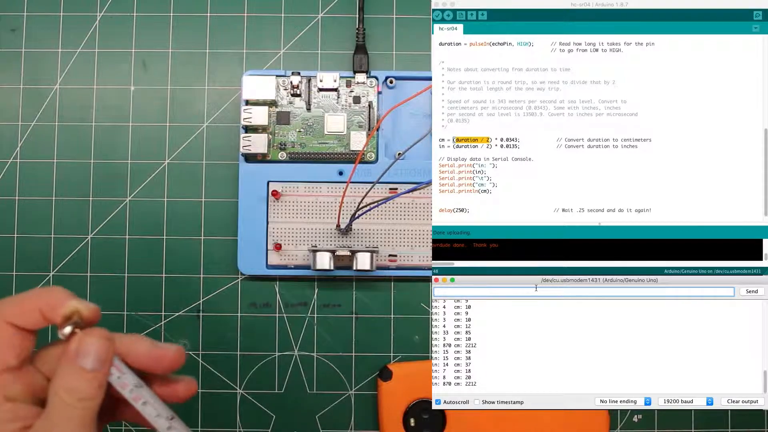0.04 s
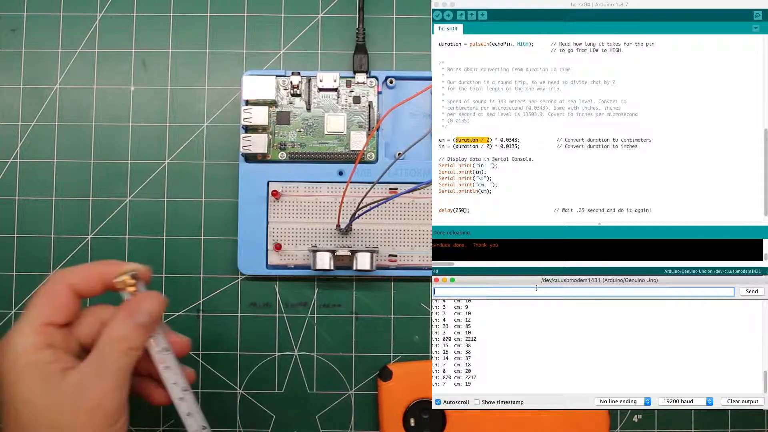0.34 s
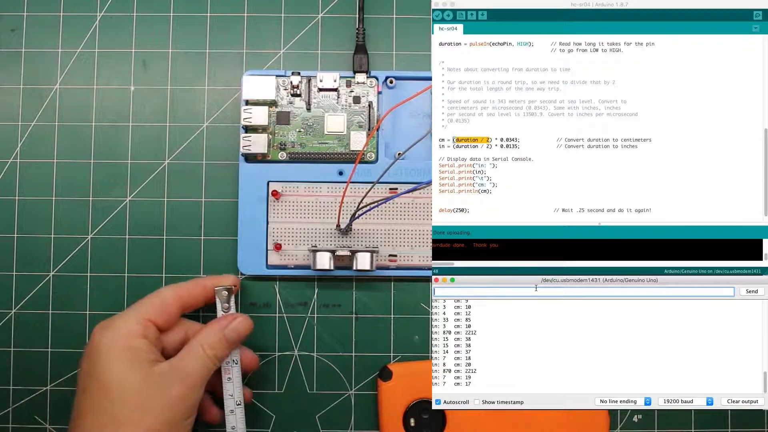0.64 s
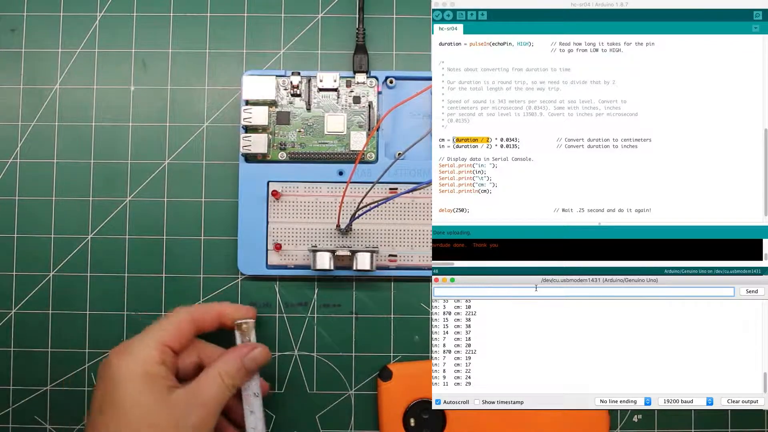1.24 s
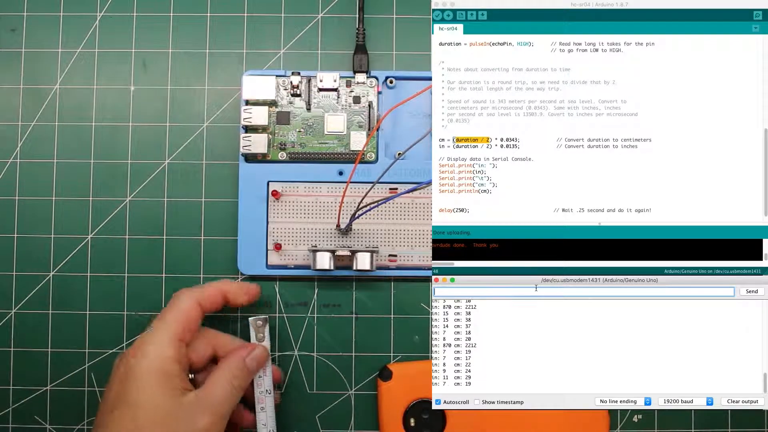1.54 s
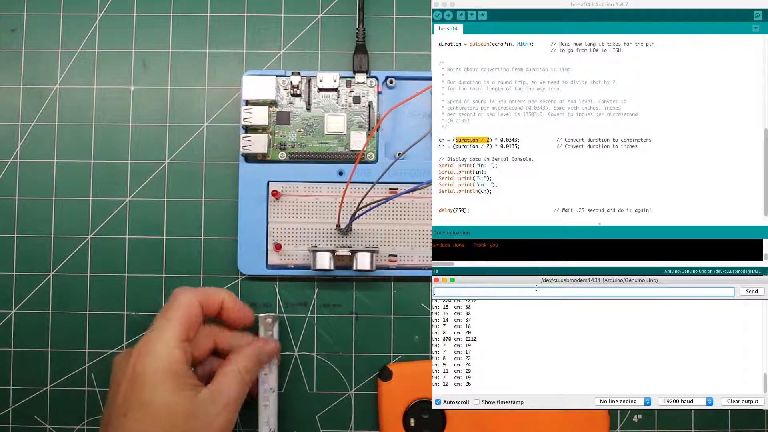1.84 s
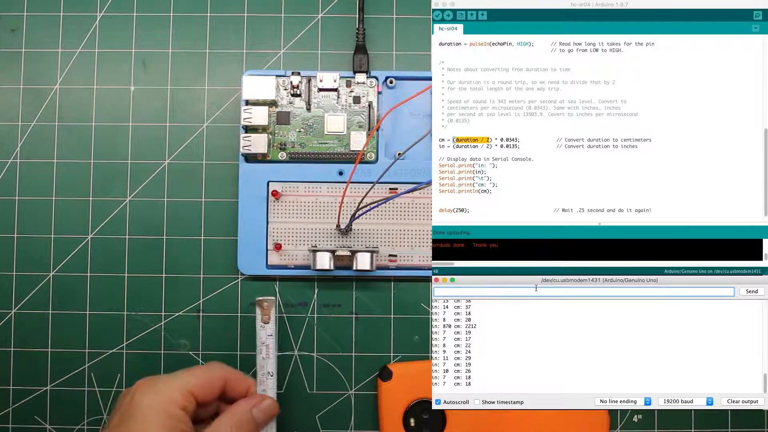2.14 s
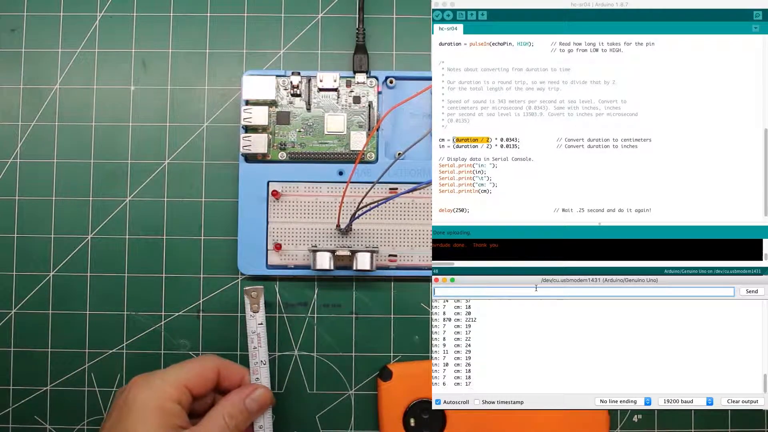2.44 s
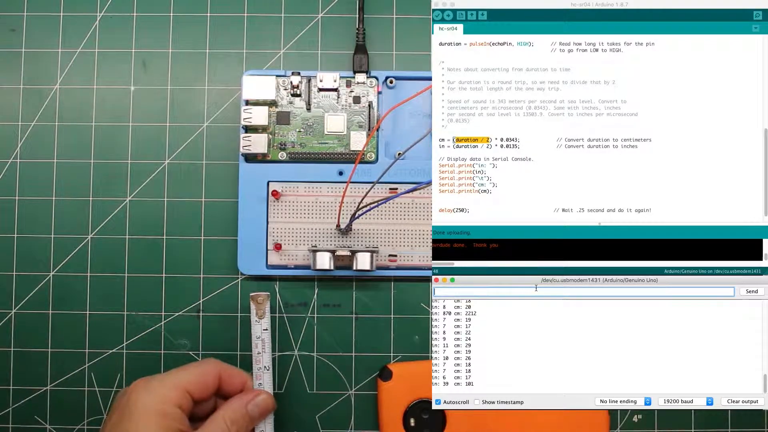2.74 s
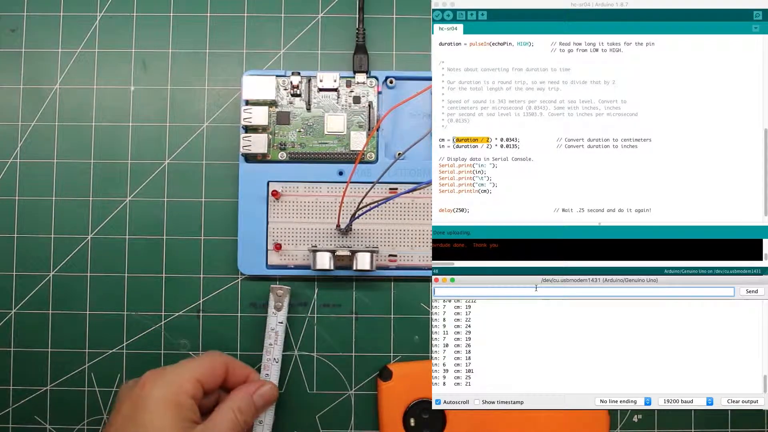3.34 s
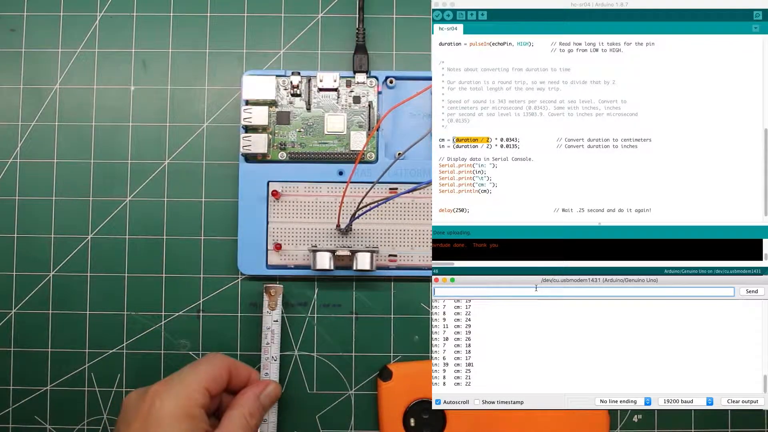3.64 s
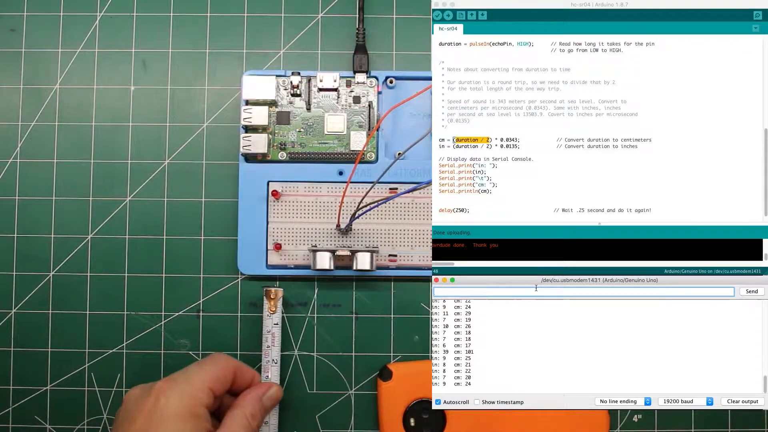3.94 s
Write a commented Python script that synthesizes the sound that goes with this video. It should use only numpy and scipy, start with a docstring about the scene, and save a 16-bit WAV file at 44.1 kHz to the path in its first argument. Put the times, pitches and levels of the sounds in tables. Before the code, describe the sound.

Light metallic clicks and scrapes of a tape measure blade, which then slaps a desk twice.

```python
"""A steel tape measure is handled over a desk mat, close to the microphone.
Its loose end hook clicks, and the thin blade scrapes and rings as it is rubbed or snapped.
Bumps set the desk ringing, and near the end the blade slaps down on it twice and chatters.
In the first second, fingers slide along the blade with a fading hiss. Behind it all are a faint hiss,
low room noise and mains hum. Both hisses and the room noise dip briefly four times a second."""
import sys
import numpy as np
from scipy import signal
from scipy.fft import rfft, irfft
from scipy.io import wavfile
from scipy.ndimage import uniform_filter1d

SR = 44100
rng = np.random.default_rng(int(sys.argv[2]) if len(sys.argv) > 2 else 0)


def generate_wav(sig):
    """Save sig (samples, or channels by samples) to the path in sys.argv[1] as 16-bit PCM at SR."""
    pcm = np.round(np.clip(np.atleast_2d(sig).T, -1, 1) * 32767).astype(np.int16)
    wavfile.write(sys.argv[1], SR, pcm)


N = 176400
T = np.arange(N) / SR

# how loud the hiss, the room and the sliding fingers are over time: t/s, level/dB
HISS_LEVEL = [(0, -67.5), (.9, -70), (1.05, -69), (1.2, -64.5), (1.45, -68.5), (1.7, -66), (1.87, -71.5),
              (2.0, -66), (2.2, -70.5), (2.48, -68), (2.95, -67.5), (3.2, -67), (3.65, -66.5), (4, -65.5)]
ROOM_LEVEL = [(0, -58), (.4, -59.5), (.8, -64.5), (1.3, -62.5), (1.55, -70), (1.75, -67), (2.3, -65.5),
              (3.1, -67), (3.65, -61), (4, -61)]
FINGER_LEVEL = [(0, -51.5), (.07, -52.5), (.19, -53), (.3, -57), (.42, -58), (.55, -58.5), (.65, -62),
                (.75, -68.5), (.92, -63.5), (1.0, -79)]
# how strong each noise is from low to high pitch: f/Hz, relative level/dB
HISS_SPECTRUM = [(880, -38), (1500, -15), (2500, -8.5), (2860, -14), (4410, -11), (4720, -12.5), (5050, -8),
                 (10600, -9.5), (13400, -24), (15000, -48)]
ROOM_SPECTRUM = [(18, -77), (30, -24), (118, -3.5), (174, -9.5), (201, -6.5), (303, -9.5), (380, -14.5),
                 (486, -17.5), (634, -27), (674, -27), (1220, -24.5), (1380, -26), (1910, -26.5),
                 (3470, -34.5), (4000, -35.5), (5200, -43), (8800, -120)]
FINGER_SPECTRUM = [(600, -28), (1200, -4.5), (1600, -15), (2400, -7), (3200, -11.5), (4300, -6),
                   (6000, -7.5), (7500, -2), (9500, -3), (11000, -0.5), (11800, -8), (12500, -17),
                   (14000, -19)]
SCRAPE_SPECTRUM = [(290, -29), (500, -10.5), (788, -18.5), (1990, -18), (3720, -5), (6030, -4.5),
                   (9250, -0.5), (12100, -11), (14000, -12), (15000, -46)]
CHATTER_SPECTRUM = [(100, -26), (200, -6), (360, -3), (550, -8.5), (720, -1), (880, -12.5), (1120, 2),
                    (1500, -10), (2200, -8.5), (3500, -17.5), (5000, -6.5), (6500, -13.5), (8200, -7),
                    (10000, -16.5), (12000, -25), (15000, -26)]
TAIL_SPECTRUM = [(100, -19), (220, -5.5), (380, 0.5), (600, -17.5), (1150, -11), (1500, -21.5), (2600, -17),
                 (4000, -23), (8000, -22.5), (11000, -29), (15000, -48)]
# the natural tones of desk and blade: f/Hz, relative level/dB, t60/s (time to fade by 60 dB)
DESK_TONES = [(78.5, -15, 0.2), (98.6, -9, 0.25), (121.9, -8.5, 0.21), (232, -7, 0.13), (281, -8.5, 0.21),
              (343.7, -2, 0.15), (361.5, -1, 0.09), (412, -11.5, 0.16), (466.5, -11.5, 0.26),
              (515, -16.5, 0.28), (702, -5.5, 0.14), (872, -18, 0.11), (1051, -9, 0.091),
              (1158, -6.5, 0.086)]
BLADE_TONES = [(2460, -23, 0.22), (3040, -3, 0.15), (3741, -25, 0.19), (4479, -28, 0.26), (5500, -26, 0.21),
               (6492, -11, 0.067), (6900, -20, 0.36), (7079, -23, 0.17), (7445, -21, 0.19),
               (8100, -22, 0.17), (8280, -14, 0.1), (9184, -13, 0.11), (10100, 2, 0.071), (9700, -26, 0.23)]
# blows that reach the desk: t/s, strength/dB, softness/s
DESK_BLOWS = [(0.115, -53, 0.00043), (1.128, -34.5, 0.0036), (1.662, -47.5, 0.00072), (1.692, -49, 0.0024),
              (2.652, -37, 0.004), (2.901, -53.5, 0.00065), (3.4375, -21.5, 0.000063),
              (3.7321, -31, 0.00096), (3.744, -21.5, 0.0038)]
# the blade slaps down: t/s, strength/dB, chatter length/s
BLADE_SLAPS = [(3.437, -23, .015), (3.733, -48, 0.025)]
# the bent blade rings, its pitch set by its free length: t/s, hold/s, f/Hz, width/Hz, level/dB, fall/s
BLADE_RINGS = [(0.103, 0.024, 2330, 300, -52, 0.03), (0.115, .008, 485, 149, -48, 0.011),
               (0.116, 0.0045, 4200, 500, -47, .016), (0.396, 0.077, 2220, 280, -69, 0.028),
               (1.103, .008, 1250, 1180, -58, 0.0033), (1.125, .16, 3080, 300, -68, 0.016),
               (1.226, .07, 2120, 318, -72, 0.014), (1.656, 0.038, 1360, 420, -65, 0.021),
               (1.662, .004, 3420, 260, -61, 0.022), (1.717, .8, 1380, 263, -79, .05),
               (2.563, 0.0088, 2650, 700, -62.5, .004), (2.9, 0.0042, 556, 280, -53.5, 0.0058),
               (2.901, 0.016, 2920, 1580, -52, .042), (3.855, 0.15, 2360, 480, -71, 0.013)]
# the blade slides against hook and mat: t/s, rough length/s, level/dB
BLADE_SCRAPES = [(1.123, 0.0068, -34), (1.154, 0.048, -55), (1.232, 0.14, -65), (1.374, 0.033, -62),
                 (1.544, 0.029, -55), (1.937, 0.052, -63.5), (2.248, 0.11, -64.5), (2.412, 0.019, -60),
                 (2.527, 0.022, -69), (2.649, 0.036, -47.5), (2.683, .016, -56), (2.769, 0.028, -45),
                 (2.806, 0.049, -54.5), (3.119, 0.011, -58.5), (3.189, 0.015, -56.5), (3.27, 0.02, -40),
                 (3.297, 0.054, -54.5), (3.701, 0.03, -56), (3.74, 0.019, -45.5), (3.769, 0.048, -53)]
# the pitch ranges of hook, body, blade and edge: low f/Hz, high f/Hz, gain/dB, short ring/dB, long ring/dB
CLICK_RANGES = [(4700, 8770, -14, -14, -32), (446, 2220, -0.5, -25, -19.5), (2230, 4800, -3, -8.5, -23),
                (8250, 12460, -7.5, -7.5, -23)]
# clicks, with a level for each range before its gain: t/s, hook/dB, body/dB, blade/dB, edge/dB, fall/s
HOOK_CLICKS = [(0.114, -12.5, -35.5, -23, -32, 0.0021), (0.286, -27, -64, -52, -46.5, 0.002),
               (0.395, -40, -66, -48, -46.5, 0.0033), (0.462, -38, -63, -58, -58, 0.0018),
               (0.894, -35.5, -69, -60.5, -54, 0.002), (0.918, -40, -68, -64, -52, 0.0023),
               (1.062, -45, -85, -59.5, -78, 0.0023), (1.127, -17, -42.5, -36.5, -26.5, 0.0018),
               (1.168, -35, -66, -53.5, -47, 0.0016), (1.223, -36.5, -76, -48, -69, 0.0017),
               (1.236, -49, -68, -52, -65, 0.0025), (1.295, -46, -65, -54.5, -55, 0.0032),
               (1.471, -43, -81, -61.5, -76, 0.002), (1.547, -39.5, -69, -62, -44.5, 0.0013),
               (1.661, -36.5, -49.5, -52, -52.5, 0.0029), (1.691, -43, -63, -57, -58, 0.0017),
               (1.79, -44, -71, -71, -53.5, 0.0026), (2.068, -45.5, -79, -64, -50.5, 0.002),
               (2.396, -39, -56, -67, -71, 0.0022), (2.418, -28.5, -56.5, -48.5, -49, 0.0023),
               (2.536, -38, -55, -59.5, -56, 0.0018), (2.563, -44, -70, -56, -75, 0.002),
               (2.651, -22, -56, -41.5, -24.5, 0.0012), (2.66, -29, -65, -54, -32, 0.0017),
               (2.676, -33, -71, -54, -40, 0.002), (2.699, -31, -62, -48, -41, 0.0023),
               (2.742, -33, -56, -49, -46.5, 0.0029), (2.772, -25, -54, -40.5, -36, 0.0035),
               (2.78, -24, -70, -59, -29.5, 0.0018), (2.797, -36, -83, -54, -54, 0.0017),
               (2.824, -35, -61, -53, -44.5, 0.0035), (2.87, -18.5, -50, -41.5, -35.5, 0.0022),
               (2.899, -11.5, -38, -21.5, -32, 0.0014), (3.071, -40, -76, -66, -62, 0.0024),
               (3.084, -41, -68, -54.5, -53.5, 0.0023), (3.134, -34.5, -80, -57, -69, 0.0016),
               (3.257, -32, -63, -58, -39.5, 0.0044), (3.314, -31, -68, -66, -37, 0.003),
               (3.718, -35, -68, -72, -40.5, 0.0023), (3.731, -18, -62, -57, -30.5, 0.0028),
               (3.766, -35, -64, -72, -49, 0.002)]


def from_db(db):
    """Turn decibels into a factor to multiply by."""
    return 10 ** (np.asarray(db) / 20)


def rms_one(x):
    """Scale a signal so that its average power is one."""
    return x / np.sqrt(np.mean(x ** 2) + 1e-20)


def coloured(x, spectrum):
    """Shape a signal's lows and highs to follow a spectrum, at average power one."""
    hz, db = np.transpose(spectrum)
    f = np.maximum(np.fft.rfftfreq(len(x), 1 / SR), 1)
    gain = from_db(np.interp(np.log(f), np.log(hz), db))
    return rms_one(irfft(rfft(x) * gain, len(x)))


def band(x, low, high, order=2):
    """Keep the frequencies between low and high, in Hz."""
    return signal.sosfilt(signal.butter(order, [low, high], "band", fs=SR, output="sos"), x)


def add(out, start, x):
    """Mix x into out at a start time in seconds."""
    i = int(start * SR)
    out[i:i + len(x)] += x[:max(N - i, 0)]


def dying(t, t60):
    """A fade that loses 60 dB every t60 seconds."""
    return np.exp(-np.log(1000) * t / t60)


def ringing(tones, t):
    """A struck object rings as a sum of fading tones, every second one flipped in sign."""
    return sum((-1) ** k * from_db(db) * np.sin(2 * np.pi * hz * t) * dying(t, t60)
               for k, (hz, db, t60) in enumerate(tones))


def stroke(t, hold, rise, fall):
    """A loudness shape that rises, stays up until the time hold, then dies away."""
    return np.clip(t / rise, 0, 1) * np.exp(-np.maximum(t - hold, 0) / fall)


def slips(per_s, spread_db):
    """Many tiny contacts at random times and of uneven size."""
    contacts = (rng.random(N) < per_s / SR) * rng.choice([-1, 1], N)
    return contacts * from_db(spread_db * np.minimum(rng.exponential(1, N), 4))


def shaped_noise(levels, spectrum):
    """Noise with a set spectrum whose loudness follows a curve over time."""
    gain = from_db(np.interp(T, *np.transpose(levels)))
    return gain * coloured(rng.standard_normal(N), spectrum)


def background(hum_hz=120.8, hum_db=-70.5):
    """Hiss, room noise and sliding fingers dip together at even intervals, over a steady mains hum."""
    hiss = shaped_noise(HISS_LEVEL, HISS_SPECTRUM)
    fingers = shaped_noise(FINGER_LEVEL, FINGER_SPECTRUM)
    room = shaped_noise(ROOM_LEVEL, ROOM_SPECTRUM)
    hum = from_db(hum_db) * np.sqrt(2) * np.sin(2 * np.pi * hum_hz * T)
    first_dip_s, every_s, width_s, dip_db = 0.072, 0.2518, 0.012, -8
    from_dip = (T - first_dip_s + every_s / 2) % every_s - every_s / 2  # time from the nearest dip
    dips = from_db(dip_db * np.exp(-(from_dip / width_s) ** 2))
    return (hiss + fingers + room) * dips + hum


def desk_knocks():
    """The desk top rings after each blow; a soft blow wakes only its low tones."""
    out, ring = np.zeros(N), ringing(DESK_TONES, T[:SR // 2])
    for start, db, softness in DESK_BLOWS:
        r = np.exp(-2 / (softness * SR))  # the nearer to 1, the duller and quieter the knock
        knock = signal.lfilter([(1 - r) ** 2], [1, -2 * r, r * r], ring)
        add(out, start, from_db(db) * knock)
    return out


def blade_slaps(settle_db_per_s=200):
    """The blade chatters on the desk, more weakly as it settles, then rings out."""
    out, t = np.zeros(N), T[:SR // 2]
    for start, db, length in BLADE_SLAPS:
        chatter = coloured(slips(per_s=5000, spread_db=2.5)[:len(t)], CHATTER_SPECTRUM)
        chatter *= stroke(t, length, rise=0.001, fall=0.0054)
        chatter *= from_db(settle_db_per_s * (length / 2 - t))
        tail = from_db(-1.5) * coloured(rng.standard_normal(len(t)), TAIL_SPECTRUM)
        tail *= dying(t, t60=0.28) * np.minimum(t / length, 1)
        ring = from_db(-14.5) * ringing(BLADE_TONES, t)
        ring *= dying(t, t60=1)  # the hand takes away a little of the ring
        add(out, start, from_db(db) * (chatter + tail + ring))
    return out


def blade_rings():
    """Rubbing and snapping make the bent blade ring, each time as noise gathered around one pitch."""
    out = np.zeros(N)
    for start, hold, hz, width_hz, db, fall in BLADE_RINGS:
        t = T[:int((hold + 6 * fall) * SR)]
        noise = band(rng.standard_normal(N), hz - width_hz / 2, hz + width_hz / 2)
        tone = rms_one(noise[-len(t):])
        add(out, start, from_db(db) * stroke(t, hold, rise=0.003, fall=fall) * tone)
    return out


def blade_scrapes():
    """The blade's edge sticks and slips thousands of times a second, in short runs."""
    pressure, t = np.zeros(N), T[:SR // 3]
    for start, length, db in BLADE_SCRAPES:
        push = stroke(t, hold=length / 2, rise=0.0028, fall=0.0057 + length * 0.14)
        add(pressure, start, from_db(db) * push)
    return pressure * coloured(slips(per_s=7000, spread_db=3.5), SCRAPE_SPECTRUM)


def hook_clicks(delay_s=0.001122, rise_s=0.00037):
    """Each snap of the loose hook shakes the steel: a crack, a short ring and a faint long one."""
    out, t = np.zeros(N), T[:SR // 3]
    for start, *levels, fall in HOOK_CLICKS:
        snap = stroke(t, 2 * rise_s, rise_s, fall)
        for db, (low, high, gain_db, short_db, long_db) in zip(levels, CLICK_RANGES):
            # the steel has so many close tones that they blur into noise
            steel = rms_one(band(rng.standard_normal(len(t)), low, high))
            crack = band(snap * rng.standard_normal(len(t)), low, high, order=3)
            crack /= np.sqrt(uniform_filter1d(crack ** 2, size=110).max())  # loudest 2.5 ms at power one
            fade = from_db(short_db) * dying(t, t60=0.06) + from_db(long_db) * dying(t, t60=0.23)
            ring = steel * fade * np.minimum(t / (2 * delay_s), 1)
            add(out, start + delay_s, from_db(db + gain_db) * (crack + ring))
    return out


def scene():
    """All the sounds add up at one microphone."""
    mix = hook_clicks() + blade_scrapes() + blade_rings() + desk_knocks() + blade_slaps() + background()
    return mix[None]


def record(dry):
    """The microphone loses deep bass and the highest treble; the very top is cut off sharply."""
    x = signal.sosfilt(signal.butter(4, 58, "high", fs=SR, output="sos"), dry)
    x = signal.sosfilt(signal.butter(7, 13200, fs=SR, output="sos"), x)
    return signal.sosfilt(signal.cheby2(12, 70, 16000, fs=SR, output="sos"), x)


dry = scene()
out = record(dry)
generate_wav(out)
```